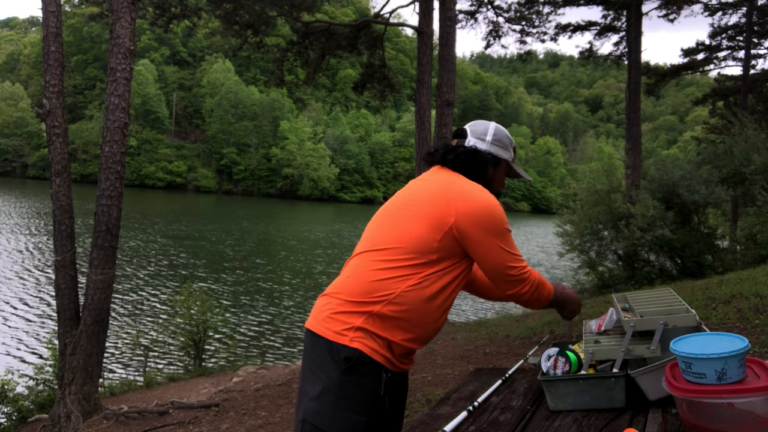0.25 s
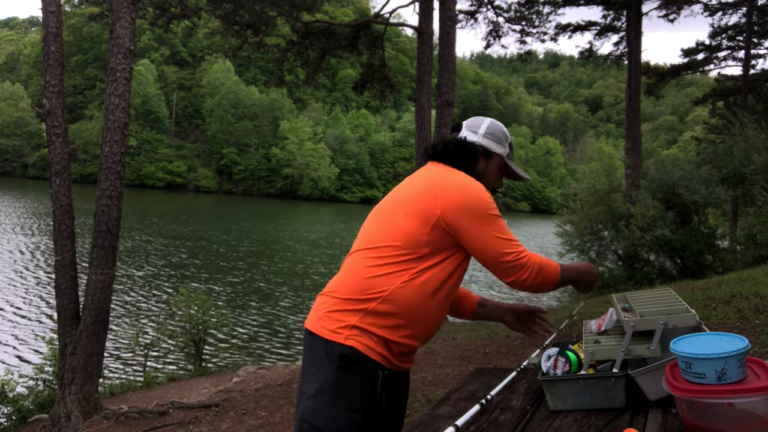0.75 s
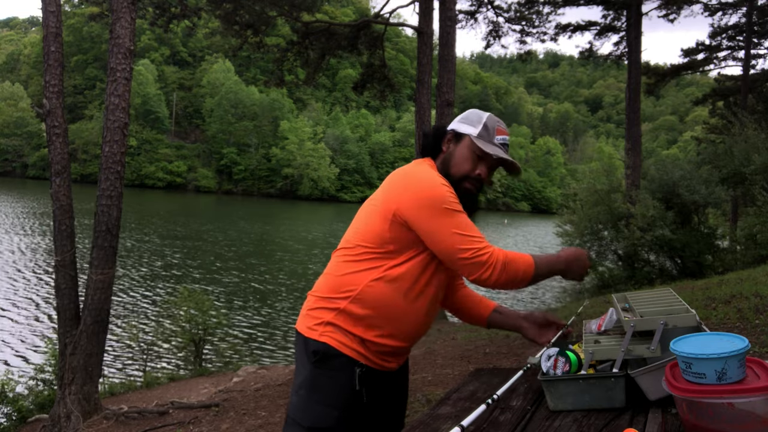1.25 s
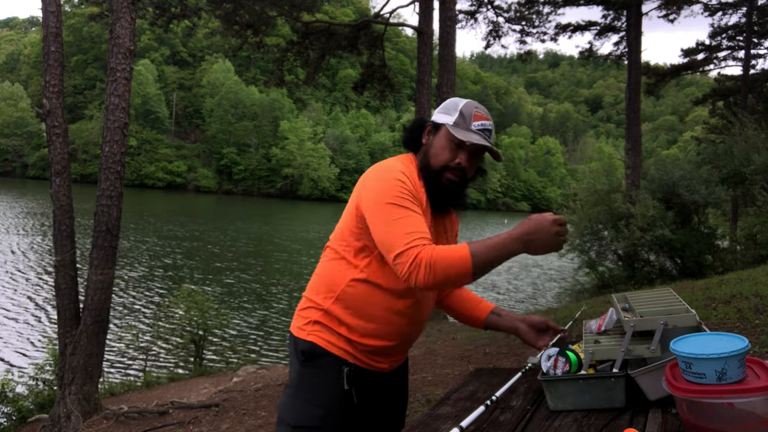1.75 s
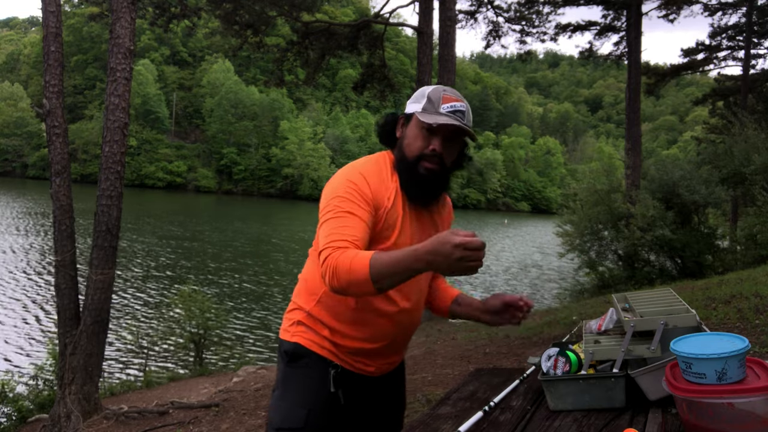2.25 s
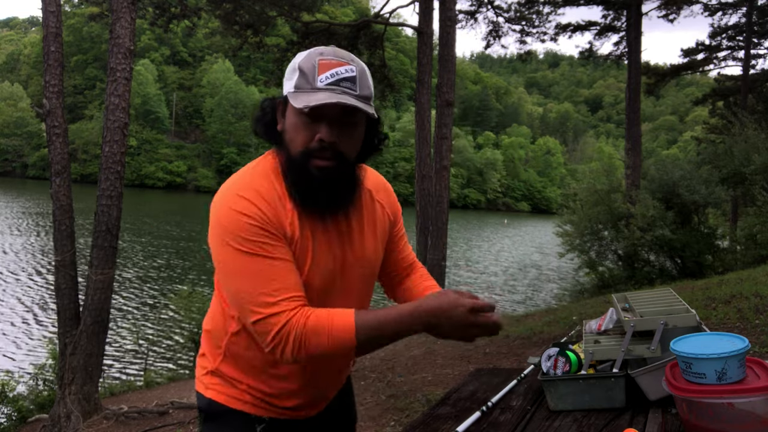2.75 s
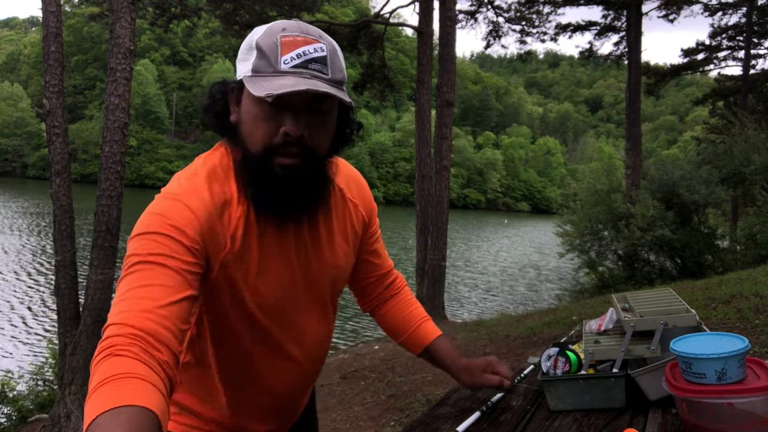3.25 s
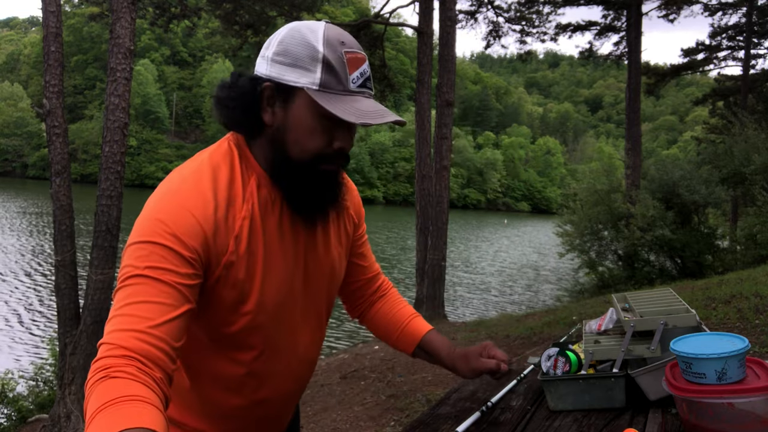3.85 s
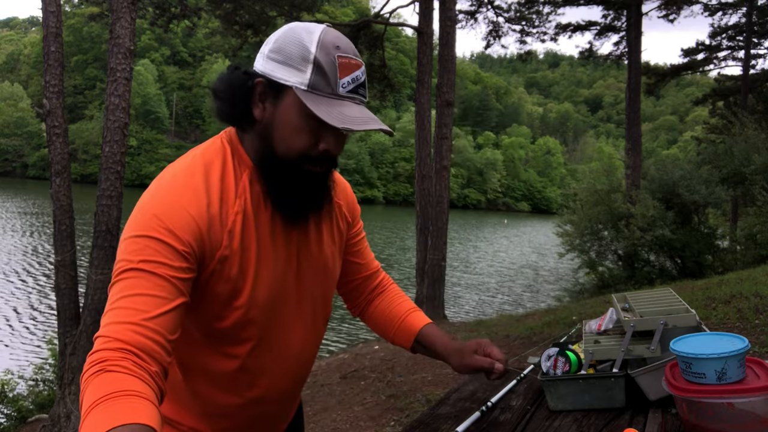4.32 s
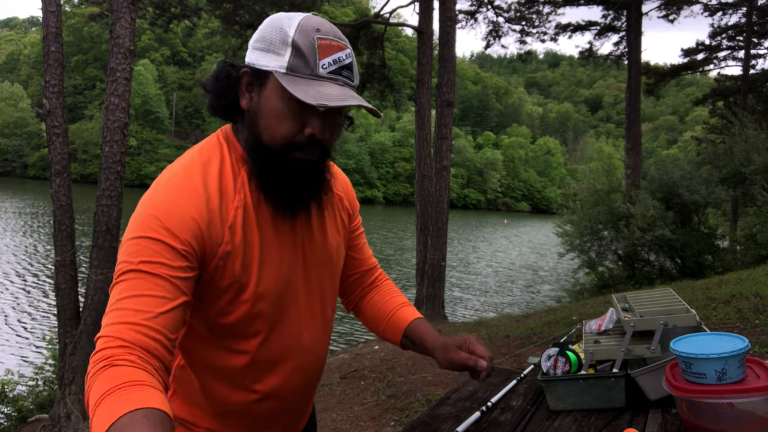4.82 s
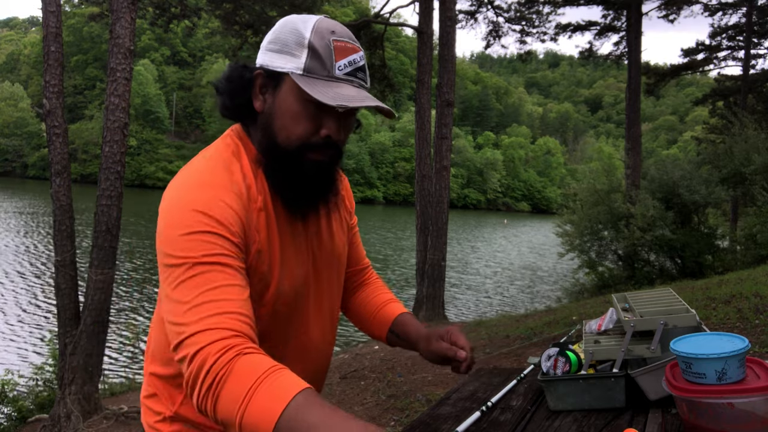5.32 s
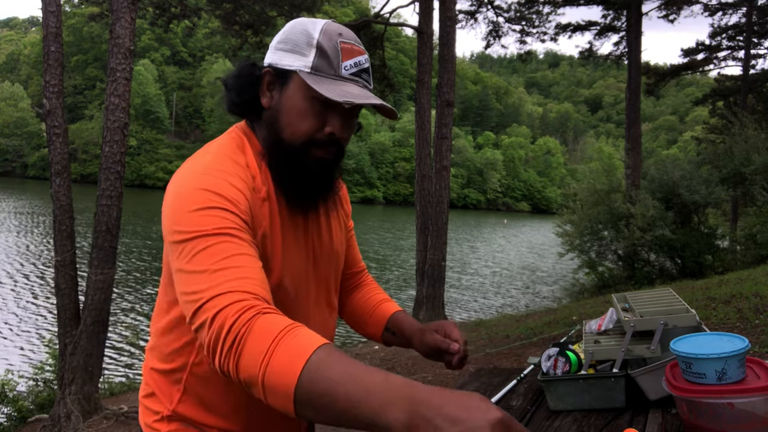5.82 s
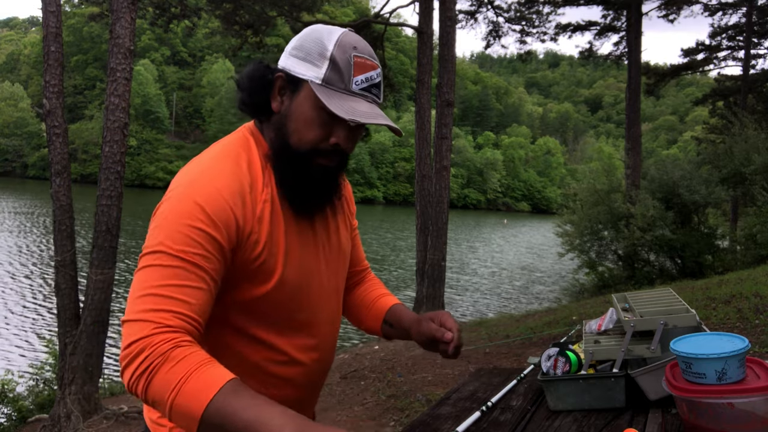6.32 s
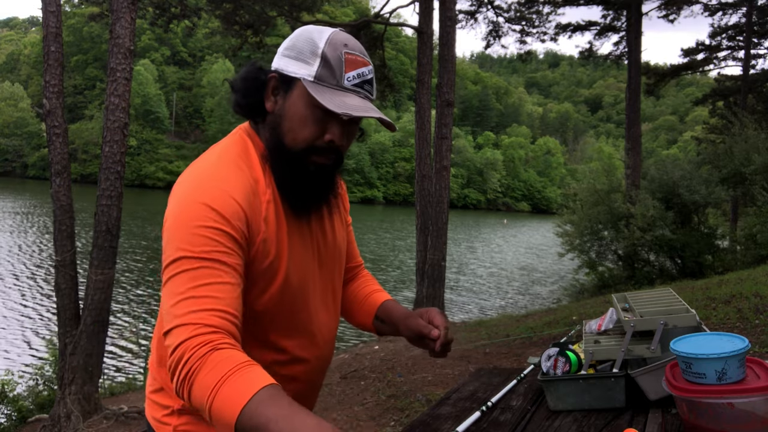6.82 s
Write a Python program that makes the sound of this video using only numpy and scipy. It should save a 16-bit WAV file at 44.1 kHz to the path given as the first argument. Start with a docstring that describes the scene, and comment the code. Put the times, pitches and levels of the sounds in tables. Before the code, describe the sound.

A quiet wooded lakeshore with a soft wash of air and a faint far hum. Birds chirp in sliding whistles, echoing among trees. Nearby, small plastic and metal bits tick, knock, clack and rattle on table boards. Two hard clicks stand out mid-way, the first much louder. Handling then stops, faint birdsong returns, and a little object clatters down in quick fading bounces before a last few chirps.

```python
"""Birds whistle and buzz in an echoing wood by a lake, over a soft wash of water, leaves and a far low hum.
Fishing tackle is handled at a wooden table: faint ticks, hollow knocks, clacks, rattles, a scrape and thuds;
a tackle clip snaps shut twice, and later a small piece drops and bounces.
Handled things are clicks that set short tones ringing, birds are gliding sines, and the air is shaped noise.
The trees and the table scatter some of the sound back as dying tails of noise."""
import sys
import numpy as np
from scipy import signal
from scipy.io import wavfile
from scipy.ndimage import uniform_filter1d

SR = 44100
rng = np.random.default_rng(int(sys.argv[2]) if len(sys.argv) > 2 else 0)


def pcm_store(signal):
    """Save signal as 16-bit PCM."""
    levels = np.round(np.clip(np.atleast_2d(signal), -1, 1) * 32767)
    wavfile.write(sys.argv[1], SR, levels.astype(np.int16).T)


N = 312076


def amp(db):
    """Turn decibels into a gain."""
    return 10 ** (np.asarray(db) / 20)


def rms_one(x):
    """Scale a sound so that its rms (average strength) is 1."""
    return x / np.sqrt(np.mean(x ** 2) + 1e-20)


def in_time(rows):
    """Draw straight lines between the rows of a curve table: each column gets one value a sample."""
    s, *columns = np.transpose(rows)
    return [np.interp(np.arange(N) / SR, s, column) for column in columns]


def drift(rate_hz):
    """Slow random wandering of rms 1: noise at every 40th sample, smoothed twice by a one-pole low-pass."""
    r = np.exp(-80 * np.pi * rate_hz / SR)
    noise = rng.standard_normal(N // 40 + 2002)
    slow = signal.lfilter([1], [1, -2 * r, r * r], noise)[2000:]   # skip the filter's start
    return np.interp(np.arange(N) / 40, np.arange(len(slow)), rms_one(slow))


def ring(push, hz, t60):
    """A push sets a sine ringing that dies by 60 dB in t60 seconds; a click of 1 gives about height 1."""
    r = amp(-60 / (max(t60, 2e-4) * SR))
    w = 2 * np.pi * min(hz, .45 * SR) / SR
    return signal.lfilter([0, np.sin(w)], [1, -2 * r * np.cos(w), r * r], push + 1e-18)


def add(out, s, sound):
    """Mix a sound in at s seconds."""
    at = round(s * SR)
    out[at:at + len(sound)] += sound[:N - at]


def band_pass(x, low_hz, high_hz):
    """Keep only what lies between two pitches."""
    return signal.sosfilt(signal.butter(2, [low_hz, high_hz], "band", fs=SR, output="sos"), x)


def coloured(spectrum, patchy_db, flicker_hz=10.5):
    """Noise in third-octave bands at the spectrum's levels, each band wandering in strength; rms 1."""
    hzs, dbs = np.transpose(spectrum)
    edges = np.geomspace(hzs[0], hzs[-1], round(3 * np.log2(hzs[-1] / hzs[0])) + 1)
    white = rng.standard_normal((2, N))   # neighbouring bands take different noise
    together, out = drift(4.0), 0
    for k, (low, high) in enumerate(zip(edges, edges[1:])):
        band = band_pass(white[k % 2], low, high)
        level_db = np.interp(np.log(low * high) / 2, np.log(hzs), dbs)
        wander_db = patchy_db * (.5 * together + drift(flicker_hz))
        out = out + band * amp(level_db + wander_db)
    return rms_one(out)


def grate(ms, grit_share=0.7):
    """A contact is a click that frays into noise, dying to about a third in the given milliseconds."""
    t = np.arange(round(.15 * SR)) / SR
    grit = rng.standard_normal(len(t)) * np.exp(-t * 1000 / max(ms, .05)) * grit_share
    grit[0] = 1
    return grit


def struck(contacts, modes, crack_hz, spot_db):
    """Each contact rings all the tones (modes) of a thing and adds a crack of noise, both tilted by brightness."""
    out = np.zeros(N)
    for s, peak_db, bright_db, ms, crack_db in contacts:
        push = grate(ms, grit_share=min(0.2 * ms, .5))   # the briefest contacts are the cleanest blows
        spot = spot_db * rng.standard_normal(len(modes))   # each contact lands on another spot
        rings = np.zeros(len(push))
        for k, (hz, db, t60) in enumerate(modes):
            tone_db = db + spot[k] + bright_db * np.log2(hz / 3000)
            rings += (-1) ** k * amp(tone_db) * ring(push, hz, t60)
        top_hz = np.clip(crack_hz[1] * amp(bright_db), 2 * crack_hz[0], .45 * SR)
        crack = band_pass(grate(ms), crack_hz[0], top_hz)
        sound = rms_one(rings) + amp(crack_db) * rms_one(crack)
        add(out, s, amp(peak_db) * sound / np.abs(sound).max())
    return out


def taps(events, ms, cycles, spread, overtone_db, purer_db=0.0):
    """Small blows: a main ring, one weaker ring below it and three above; purer_db ties their level to pitch."""
    out = np.zeros(N)
    usual_hz = np.median(np.array(events)[:, 2])
    for s, peak_db, hz in events:
        push = grate(ms)
        t60 = cycles / hz
        side_db = overtone_db - purer_db * np.log2(hz / usual_hz)   # above 0, purer_db makes high blows purer
        sound = ring(push, hz, t60)
        for step in (-1, 1, 2, 3):
            gain = (-1) ** step * amp(side_db * abs(step))
            sound += gain * ring(push, hz * spread ** step, t60)
        add(out, s, amp(peak_db) * sound / np.abs(sound).max())
    return out


def scatter(x, t60, gap, dull):
    """Surroundings send sound back as a dense tail of noise that swells over the gap [s] while dying away."""
    t = np.arange(round(1.5 * SR)) / SR
    tail = rng.standard_normal(len(t)) * amp(-60 * t / t60) * np.clip(t / gap, 0, 1) ** 2
    tail = signal.lfilter([1], [1, -np.clip(dull, -.9, .9)], tail)   # soft surfaces dull the echo
    return signal.fftconvolve(x, tail / np.sqrt(np.sum(tail ** 2)))[:N]


def air():
    """Five noises: rumble, wash and rustle that rise and fall, and leaves and water and deep air that hold."""
    # background levels: (time [s], rumble [dB], wash [dB], rustle of sleeve and hands [dB])
    air_levels = [(0.0, -65.5, -66, -76.5), (0.45, -63, -74.5, -77.5), (0.67, -76.5, -70, -77.5),
                  (0.95, -60.5, -64, -73), (1.1, -70, -67.5, -77), (1.36, -67, -70, -73),
                  (2.09, -64, -68.5, -72.5), (2.34, -61, -66, -76), (2.6, -69, -65.5, -70.5),
                  (3.21, -68, -66, -74), (3.47, -67.5, -67, -77), (3.65, -66.5, -65, -65.5),
                  (4.0, -58.5, -65.5, -76), (4.39, -67, -65, -76), (5.73, -68, -65.5, -78),
                  (6.09, -64, -60.5, -74.5), (6.35, -69, -65, -77), (7.08, -66.5, -63.5, -77.5)]
    # colour of the rumble: (pitch [Hz], relative level [dB per Hz])
    rumble_colour = [(50, -49), (85, -20), (96, -7.5), (182, -5.5), (350, -22), (403, -23), (500, -19.5),
                     (650, -51), (1100, -120)]
    # colour of the wash: (pitch [Hz], relative level [dB per Hz])
    wash_colour = [(88, -28.5), (150, -3.5), (326, 0.5), (376, -4), (646, 1.5), (1030, -8), (1180, -14.5),
                   (2020, -24.5), (2500, -24.5), (3250, -52.5), (5500, -120)]
    # colour of the rustle: (pitch [Hz], relative level [dB per Hz])
    rustle_colour = [(710, -29.5), (1200, -1.5), (2610, -5.5), (3630, -2), (4100, -5), (7910, -9.5),
                     (15300, -19.5), (16500, -31)]
    # colour of steady leaves and water: (pitch [Hz], relative level [dB per Hz])
    hiss_colour = [(710, -29), (1200, 1), (1600, -3.5), (2850, -7), (3150, -6.5), (5050, -13), (7330, -19),
                   (14300, -25), (16500, -37)]
    # colour of the steady deep air: (pitch [Hz], relative level [dB per Hz])
    deep_colour = [(12, -58.5), (20, -31), (32, -22.5), (40, -8), (54, -1), (110, -5), (140, -34.5),
                   (240, -120)]
    hiss_db, deep_db = -74, -74.5
    rumble_db, wash_db, rustle_db = in_time(air_levels)
    rumble = amp(rumble_db) * coloured(rumble_colour, patchy_db=1.9)
    wash = amp(wash_db) * coloured(wash_colour, patchy_db=1.6)
    rustle = amp(rustle_db + 1.5 * drift(45.0)) * coloured(rustle_colour, patchy_db=1.0, flicker_hz=14.0)
    hiss = amp(hiss_db) * coloured(hiss_colour, patchy_db=2.5)
    deep = amp(deep_db) * coloured(deep_colour, patchy_db=-0.5)
    return rumble + wash + rustle + hiss + deep


def drone():
    """A far motor-like hum: one low sine that wavers in pitch and strength."""
    # swelling of the hum: (time [s], rms level before wavering [dB])
    drone_levels = [(0, -72), (.5, -86), (1.0, -68.5), (1.36, -74), (2.26, -66), (2.5, -66), (2.8, -61),
                    (3.03, -75.5), (4.5, -76), (6.4, -72.5), (7.08, -77)]
    db, = in_time(drone_levels)
    hz = 79.2 + 5.3 * drift(12.0)
    return np.sqrt(2) * amp(db + 1.5 * drift(6.0)) * np.sin(2 * np.pi * np.cumsum(hz) / SR)


def whistle_notes():
    """A whistle is a sine that slides down, swings up and holds; gives (start, level, note) for each."""
    # whistles; a part of 0 s is missing; levels are before edge fades and flutter: (start [s], fall [s],
    # rise [s], hold [s], start pitch [Hz], lowest pitch [Hz], end pitch before the hold's climb [Hz],
    # level at the lowest point [dB], end level [dB])
    whistles = [(0.252, 0.063, 0.039, 0.02, 4460, 3120, 4400, -78, -77),
                (.375, 0.026, 0.022, 0.006, 4175, 2690, 3150, -73, -68),
                (.419, 0.015, 0.0024, 0.005, 3150, 2520, 2540, -78, -78),
                (0.5, 0.082, 0.035, 0.077, 4440, 3080, 4410, -63.5, -71),
                (.745, 0.087, 0.046, .045, 4450, 3130, 4530, -61.5, -58.5),
                (0.946, .042, .034, .045, 6300, 4820, 6400, -55.5, -72),
                (.97, 0, 0.023, 0, 2300, 2290, 2590, -68, -68),
                (1.078, 0.1, 0, 0, 6080, 2780, 2780, -65.5, -67),
                (1.321, 0.0032, 0.043, 0, 2190, 2220, 2870, -74, -67),
                (1.486, 0.046, 0, 0, 4320, 3040, 3090, -78, -78),
                (1.679, 0, 0.043, 0, 2240, 2250, 2850, -78, -74),
                (1.83, 0.051, 0, 0.0062, 4380, 3400, 3420, -83, -82),
                (1.991, .06, 0.00076, 0, 6330, 3790, 3790, -70, -76),
                (2.32, 0, .022, 0.0032, 2850, 2860, 3020, -74, -63.5),
                (2.342, 0.064, 0.0018, 0.011, 3050, 2390, 2400, -76.5, -77),
                (4.825, 0, 0.038, .025, 2600, 2610, 3370, -76, -81),
                (4.889, .035, 0.00091, 0.012, 2900, 2520, 2540, -76, -80),
                (4.946, 0.0089, 0, 0, 2430, 2240, 2240, -82, -82.5),
                (5.018, .03, 0.0026, 0, 2900, 2230, 2230, -82, -81),
                (5.078, 0.015, 0.021, 0.0029, 2890, 2900, 3780, -72, -74),
                (5.206, 0, .03, 0.1, 3070, 3070, 3870, -75, -81.5),
                (5.4, 0.078, 0, 0, 3950, 2860, 2850, -79, -82),
                (5.488, 0.0022, 0.035, 0.094, 2760, 2730, 3890, -70, -79),
                (5.612, 0.027, 0.0022, 0.0093, 4850, 4840, 4890, -76, -76),
                (5.622, 0.045, 0.0028, .04, 4890, 3900, 3850, -78, -82.5),
                (5.67, 0, 0.035, .05, 5300, 5300, 5620, -77.5, -79.5),
                (5.79, .072, .004, 0, 4250, 2520, 2540, -75, -80),
                (6.556, .016, .003, .015, 7000, 4880, 4900, -63, -72),
                (6.93, 0.033, 0.0028, 0, 5920, 4110, 4110, -74, -79)]
    waver = .006 * drift(60.0)   # unsteady pitch, as a share of it
    rise_ease, last_fall_ease = 1.8, 2.2   # powers: rises slow as they arrive, closing falls level out
    hold_climb = .025   # a hold creeps up by this share of its pitch
    last_fall_fade_db = 10.5   # a note with no rise loses this much while it falls
    note_edge = 0.31   # share of a note spent swelling and fading
    notes = []
    for start, fall, rise, hold, start_hz, low_hz, end_hz, db, end_db in whistles:
        bends = np.cumsum([0, fall, rise, hold])
        t = np.arange(0, bends[-1], 1 / SR)
        down, up, held = [np.clip((t - a) / max(b - a, 1e-4), 0, 1) for a, b in zip(bends, bends[1:])]
        down = 1 - (1 - down) ** (1 if rise else last_fall_ease)   # a fall into a rise keeps its speed
        swing = 1 - (1 - up ** 1.5) ** rise_ease
        hz = start_hz + (low_hz - start_hz) * down + (end_hz - low_hz) * swing
        hz = hz * (1 + hold_climb * np.sqrt(held) + waver[round(start * SR):][:len(t)])
        glide = uniform_filter1d(hz, size=450, mode="nearest")   # bends are rounded
        level_db = (end_db - db) * np.interp(t, bends[[1, 3]], [0, 1])
        level_db = level_db + (0 if rise else last_fall_fade_db) * (1 - down ** 2)
        shape = amp(level_db) * signal.windows.tukey(len(t), note_edge)
        notes.append((start, db, shape * np.sin(2 * np.pi * np.cumsum(glide) / SR)))
    return notes


def buzz_notes():
    """A buzz is a sine whose pitch shakes fast, less evenly when faint; gives (start, level, note) for each."""
    # buzzy notes: (start [s], end [s], start pitch [Hz], end pitch [Hz], trill [shakes per s],
    # swing either way [Hz], level before edge fades and flutter [dB])
    buzzes = [(-.05, 0.115, 5970, 6230, 220, 380, -64.5), (1.518, 1.618, 7300, 8000, 150, 260, -81),
              (1.67, 1.73, 8000, 7500, 150, 170, -87), (1.804, 1.867, 7300, 7760, 150, 200, -78),
              (1.886, 1.972, 6600, 6700, 180, 420, -73.5), (6.558, 6.615, 8940, 7100, 170, 200, -81),
              (6.73, 6.787, 7500, 8000, 130, 250, -83), (6.811, 6.867, 7150, 6500, 140, 340, -76),
              (6.854, 6.932, 6500, 7260, 210, 530, -76.5)]
    near_db, blur_per_db = -63, .0045   # unsteadiness of the trill [radians a sample for each dB fainter]
    notes = []
    for start, end, start_hz, end_hz, trill, swing_hz, db in buzzes:
        t = np.arange(0, end - start, 1 / SR)
        wander = blur_per_db * (near_db - db) * np.cumsum(rng.standard_normal(len(t)))
        shake = swing_hz * np.sin(2 * np.pi * trill * t + wander)
        hz = np.linspace(start_hz, end_hz, len(t)) + shake
        note = np.sin(2 * np.pi * np.cumsum(hz) / SR) * signal.windows.tukey(len(t), .6)
        begun = round(max(-start, 0) * SR)   # a note may have begun before time 0
        notes.append((max(start, 0), db, note[begun:]))
    return notes


def birds():
    """Whistles and buzzes of far birds; gives the song heard directly and the song sent to the trunks."""
    near_db, near_echo_db, echo_per_db = -63, -7, 0.19   # the echo's share grows for each dB fainter
    deep_wood_s, deep_echo_db = 4.0, 4.5   # later songs come from deeper in the wood
    buzz_echo_loss_db = 1   # high buzzes come back weaker
    song, sent = np.zeros((2, N))

    def sing(s, db, note, loss_db=0):
        """A fainter, farther bird is heard more by its echo."""
        echo_db = near_echo_db + echo_per_db * (near_db - db) + deep_echo_db * (s > deep_wood_s) - loss_db
        add(song, s, np.sqrt(2) * amp(db) * note)
        add(sent, s, np.sqrt(2) * amp(db + echo_db) * note)

    for start, db, note in whistle_notes():
        sing(start, db, note)
    for start, db, note in buzz_notes():
        sing(start, db, note, buzz_echo_loss_db)
    flutter = amp(2.7 * drift(40.0))   # moving air and leaves make far song flutter
    return song * flutter, sent * flutter


def knocks():
    """Hollow plastic knocks: low rings of eleven cycles, purer when higher."""
    # knocks: (time [s], peak level [dB], centre pitch [Hz])
    knock_rows = [(0.043, -54.5, 480), (0.146, -50.5, 306), (0.218, -52, 417), (0.311, -50.5, 302),
                  (0.834, -48, 386), (0.849, -49.5, 345), (0.933, -51, 800), (1.095, -44, 355),
                  (1.169, -45.5, 350), (1.312, -56, 400), (1.351, -53.5, 400), (1.421, -51, 365),
                  (1.569, -56, 497), (2.181, -42.5, 835), (2.387, -55, 820), (2.513, -44, 890),
                  (2.537, -43.5, 937), (2.549, -48, 766), (2.712, -49.5, 815), (3.101, -49.5, 361),
                  (3.641, -42, 455), (4.143, -39, 480), (6.029, -39, 1040)]
    return taps(knock_rows, ms=5.5, cycles=11, spread=1.45, overtone_db=-5, purer_db=3.5)


def faint_ticks(count):
    """Weak ticks at random moments and pitches while the line is worked."""
    u = rng.random((count, 3))
    s = np.interp(u[:, 0], [0, 1], (.8, 3.5))
    peak_db = -61 + 4 * (u[:, 1] - .5)
    hz = np.interp(u[:, 2], [0, 1], (5000, 8000))
    return np.c_[s, peak_db, hz]


def ticks():
    """Dry ticks of line and hooks: high rings that die within a few cycles, richer when higher."""
    # ticks: (time [s], peak level [dB], centre pitch [Hz])
    tick_rows = [(0.1313, -50, 6320), (0.2016, -47, 5570), (0.2994, -54.5, 6280), (0.4, -57, 5410),
                 (0.826, -51, 6560), (0.84, -45.5, 5020), (1.0874, -44.5, 5330), (1.1568, -49, 5880),
                 (1.181, -50.5, 5350), (1.2153, -53, 6360), (1.3054, -50, 6700), (1.3438, -47.5, 8030),
                 (1.384, -55, 5060), (1.4122, -47, 11700), (1.4398, -46.5, 8100), (1.455, -53, 7740),
                 (1.5758, -50, 8000), (1.606, -51, 6640), (1.6492, -54, 6740), (1.699, -46.5, 5000),
                 (1.7933, -56, 5050), (1.8926, -54, 6420), (1.9225, -52, 6680), (1.9888, -49.5, 6310),
                 (2.0148, -50, 5030), (2.1252, -39, 5540), (2.1795, -47, 5060), (2.538, -55, 5400),
                 (2.545, -52, 5400), (2.7095, -55, 5040), (2.7766, -51, 7900), (2.8998, -50, 6000),
                 (3.1038, -44.5, 8000), (3.3864, -58, 8660), (3.4336, -55, 7860), (3.479, -53, 6000),
                 (3.5128, -48.5, 7730), (3.7928, -51.5, 8790), (4.0065, -47.5, 6560), (4.354, -47.5, 6470),
                 (6.1522, -50.5, 5690)]
    every_tick = [*tick_rows, *faint_ticks(count=10)]
    return taps(every_tick, ms=0.95, cycles=3.6, spread=2.38, overtone_db=-5, purer_db=-2.0)


def thuds():
    """Thuds through the table boards: low rings with the deepest bass taken out."""
    # thuds: (time [s], peak level before the bass cut [dB], centre pitch [Hz])
    thud_rows = [(0.148, -46.5, 151), (0.208, -54, 144), (0.315, -49, 147.5), (0.416, -50, 226),
                 (0.628, -54, 141), (0.849, -50, 128), (0.965, -43, 134), (1.04, -55, 148),
                 (1.092, -54, 293), (1.162, -50, 151), (2.19, -36.5, 130), (2.225, -46, 115),
                 (2.261, -43, 120), (2.329, -52.5, 154), (2.399, -53, 111), (2.522, -45.5, 239),
                 (2.715, -44.5, 147), (3.052, -53, 162), (3.092, -52, 217), (3.64, -46, 160),
                 (4.149, -42, 104), (4.188, -47.5, 141), (4.459, -54, 222), (6.019, -47, 150),
                 (6.158, -54.5, 158)]
    bass_cut = signal.butter(2, 70, "high", fs=SR, output="sos")   # the deepest bass is cut away below 70 Hz
    blows = taps(thud_rows, ms=7, cycles=17, spread=1.7, overtone_db=-6.5, purer_db=1.5)
    return signal.sosfilt(bass_cut, blows)


def rattles():
    """Loose bits shaken together, and one narrow scrape near 3 kHz at 3.93 s: random grains at a steady
    rate, weakening, dealt to ten short rings."""
    # rattles and the scrape: (start [s], weakening time to about a third [s], grains at random [per s],
    # lowest pitch [Hz], highest pitch [Hz], level before the random grain sizes [dB])
    rattle_rows = [(0.826, 0.029, 380, 2520, 12000, -58), (2.516, 0.087, 800, 3040, 5560, -60),
                   (2.639, 0.26, 930, 2420, 9000, -68.5), (3.04, 0.041, 450, 1480, 6100, -63.5),
                   (3.65, 0.053, 3000, 4000, 10870, -60), (3.93, 0.31, 2500, 2580, 3680, -70.5),
                   (3.099, 0.012, 1900, 2650, 11800, -56)]
    out, t = np.zeros(N), np.arange(SR // 2) / SR
    for start, dying, per_s, low_hz, high_hz, db in rattle_rows:
        sizes = amp(3.22 * np.minimum(rng.exponential(1, len(t)), 3)) * np.exp(-t / dying)
        grains = sizes * (rng.random(len(t)) < per_s / SR)
        dealt = rng.integers(0, 10, len(t))
        pitches = np.geomspace(low_hz, high_hz, 10)
        rings = sum(ring(grains * (dealt == k), hz, 20.0 / hz) for k, hz in enumerate(pitches))
        add(out, start, amp(db) * rings)
    return out


def clacks():
    """Small plastic parts clacking, and one loud low ring at 4.1365 s that sounds within the second snap: rings
    of twenty-eight cycles with weak neighbours."""
    # clacks: (time [s], peak level [dB], centre pitch [Hz])
    clack_rows = [(0.8316, -60, 3440), (0.929, -57, 2500), (1.58, -55.5, 1630), (1.609, -55.5, 1570),
                  (1.829, -57, 3040), (1.9243, -57, 3000), (2.1256, -47, 2960), (2.1815, -49.5, 1640),
                  (2.5134, -49.5, 3200), (2.5366, -46, 3400), (2.5614, -55, 3510), (2.582, -58, 1700),
                  (2.8399, -56, 3685), (3.1054, -51, 3830), (3.5364, -60, 3680), (3.7688, -55, 3400),
                  (4.1215, -48, 2600), (4.1365, -25.5, 1710)]
    return taps(clack_rows, ms=2.5, cycles=28, spread=1.43, overtone_db=-12, purer_db=1.5)


def clip_snaps():
    """A tackle clip snaps shut twice, each time as a quick run of contacts that ring its modes."""
    # contacts: (time [s], peak level [dB], brightness [dB per octave], grating [ms], crack over ring [dB])
    snap_contacts = [(3.6053, -52.5, 3, 1.8, 6.5), (3.6227, -33.5, -12, 2.2, 4),
                     (3.6256, -18.5, 2.5, 1.66, 22), (3.6287, -3.5, 1.5, 0.14, -13.5),
                     (3.6300, -22, -2, 5.9, -5.5), (3.6484, -36.5, -4.5, 4.3, -5.5),
                     (4.1332, -33, 4, 1.2, 10), (4.1342, -25, 10, 1.33, 13), (4.1352, -38, 3, 0.5, -19),
                     (4.1364, -15, -1.5, 1.3, 1), (4.1385, -31, 4, 2.7, -9), (4.1530, -42.5, -10.5, 7.5, 0)]
    clip_modes = [(430, -31.5, 0.04), (866, -19.5, 0.028), (1140, -14.5, 0.012), (1570, -18.5, 0.012),
                  (2030, -9.5, 0.03), (2660, -7, .012), (3355, 1, 0.0083), (4000, 0, 0.0063),
                  (5000, -4.5, 0.0046), (5760, -9, 0.0071), (6500, -11, .009), (8170, -1, 0.0048),
                  (9540, -10.5, .005), (10100, -10, 0.0055), (14700, -17.5, .002)]
    return struck(snap_contacts, clip_modes, crack_hz=(1300, 9000), spot_db=2.0)


def dropped_piece():
    """A small piece lands and bounces; weaker contacts are duller and skid longer."""
    # contacts: (time [s], peak level [dB])
    bounce_rows = [(6.0122, -16.5), (6.0149, -20.5), (6.0282, -27.5), (6.0405, -36), (6.0550, -41),
                   (6.057, -50), (6.065, -41.5), (6.0720, -53), (6.0775, -45), (6.0820, -58), (6.1220, -58),
                   (6.151, -47.5)]
    # tones of the piece: (pitch [Hz], relative level [dB], time to die by 60 dB [s])
    piece_modes = [(333, -13, 0.025), (495, -13, 0.051), (1040, -8, 0.043), (1162, -9.5, 0.042),
                   (1484, -7, 0.1), (2230, -7, 0.0078), (2984, -11, 0.082), (4180, 2.5, 0.016),
                   (5300, -3, 0.0054), (5680, 0.5, 0.01), (6330, -5, 0.0093), (7930, -15, 0.0069),
                   (10910, -2, 0.006)]
    first_edge_db = 5   # the landing is on a sharp edge, brighter by this much per octave
    dulling = 0.23   # brightness lost [dB per octave] for each dB of weaker contact
    grate_ms, grate_ms_per_db = 2.3, 0.09   # grating of the landing, and more for each dB weaker
    crack_db = -1.5   # crack over ring
    first_s, top_db = bounce_rows[0]
    contacts = []
    for s, db in bounce_rows:
        weaker_db = top_db - db
        bright_db = first_edge_db * (s == first_s) - dulling * weaker_db
        contacts.append((s, db, bright_db, grate_ms + grate_ms_per_db * weaker_db, crack_db))
    return struck(contacts, piece_modes, crack_hz=(600, 8000), spot_db=1.5)


def scene():
    """Table sounds close by, birds far off in the trees, air around."""
    background = air() + drone()
    song, sent = birds()
    soft = knocks() + ticks() + thuds() + rattles() + clacks()
    hard = clip_snaps() + dropped_piece()
    table_echo = amp(-28) * scatter(hard, t60=.3, gap=.005, dull=.1)
    wood_echo = scatter(sent, t60=0.65, gap=.012, dull=0.16)
    return (hard + soft + song + table_echo + wood_echo + background)[None]


def record(dry):
    """A steep low-pass filter takes away the very top, by 70 dB from 16.8 kHz up."""
    return signal.sosfilt(signal.cheby2(14, 70, 16800, fs=SR, output="sos"), dry)


dry = scene()
out = record(dry)
pcm_store(out)
```